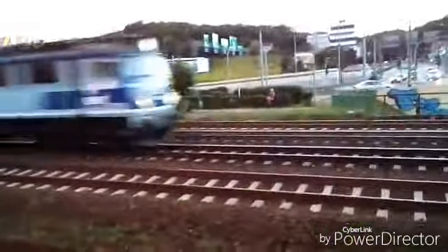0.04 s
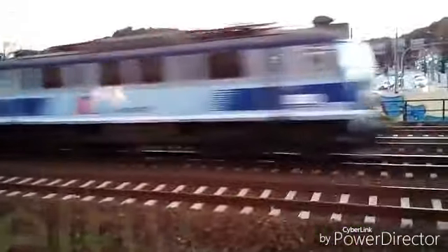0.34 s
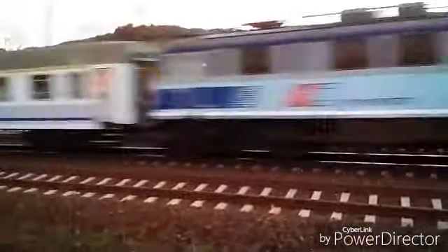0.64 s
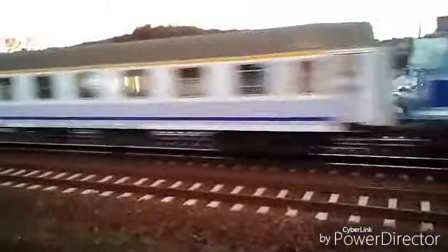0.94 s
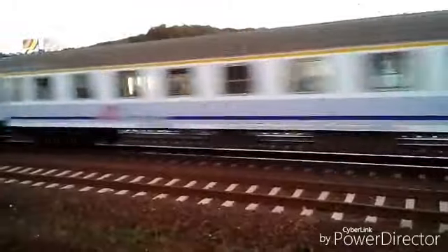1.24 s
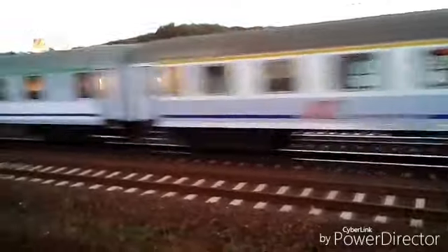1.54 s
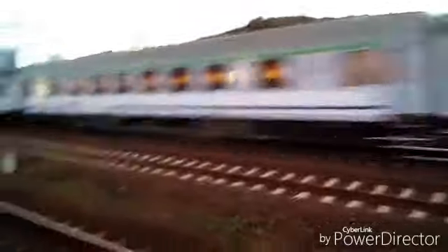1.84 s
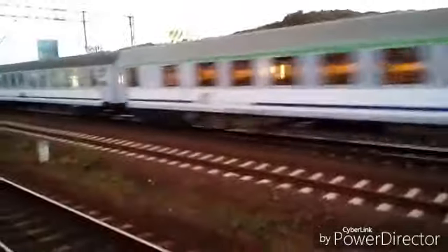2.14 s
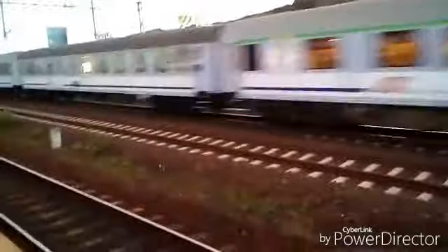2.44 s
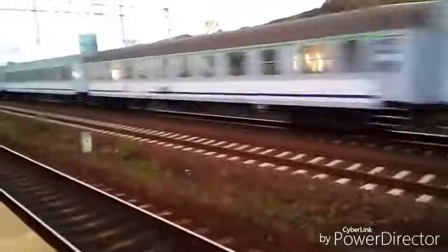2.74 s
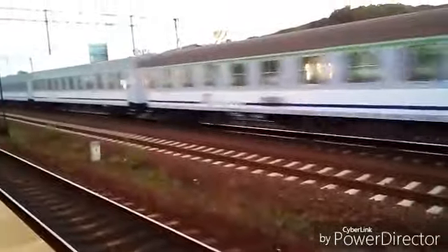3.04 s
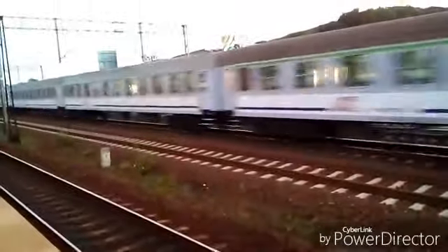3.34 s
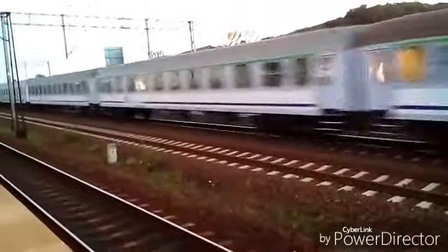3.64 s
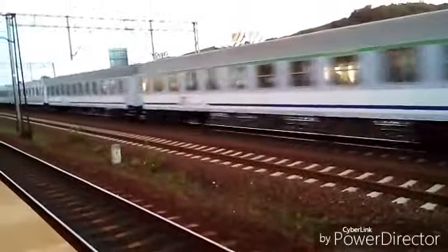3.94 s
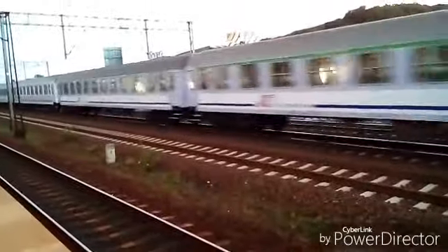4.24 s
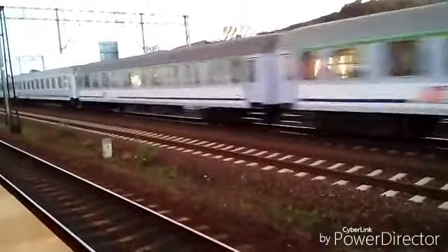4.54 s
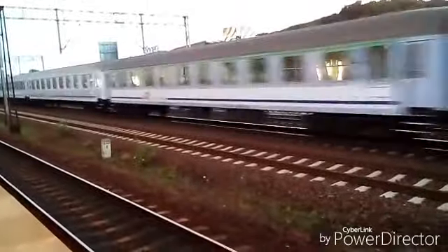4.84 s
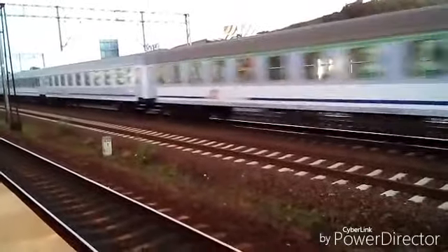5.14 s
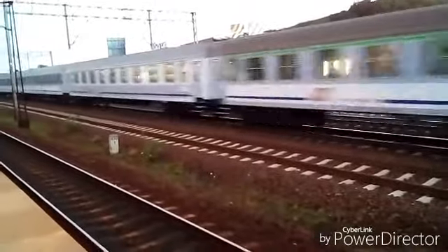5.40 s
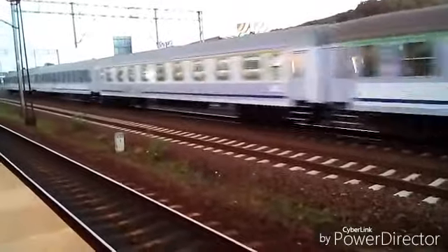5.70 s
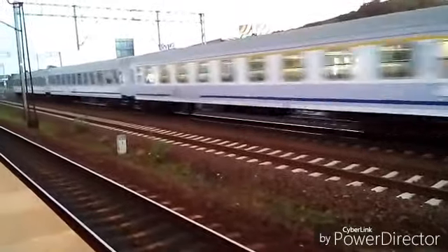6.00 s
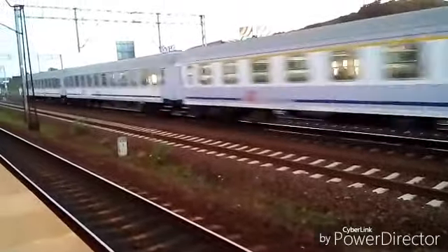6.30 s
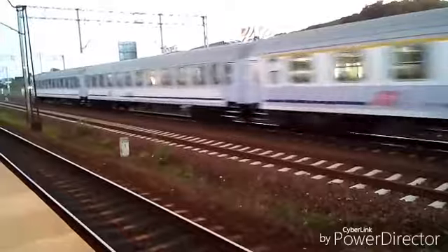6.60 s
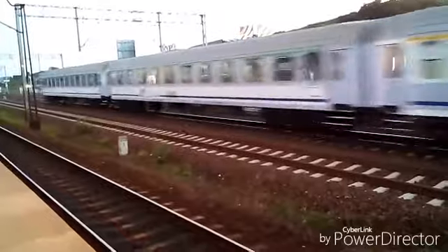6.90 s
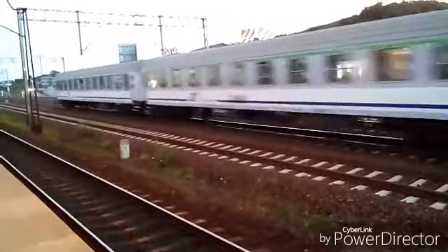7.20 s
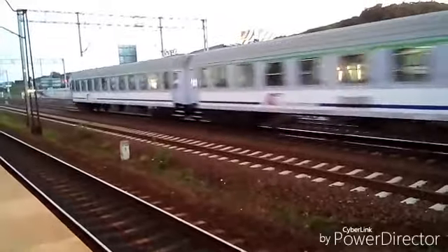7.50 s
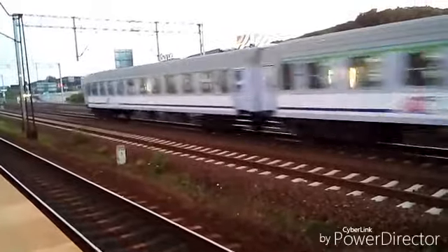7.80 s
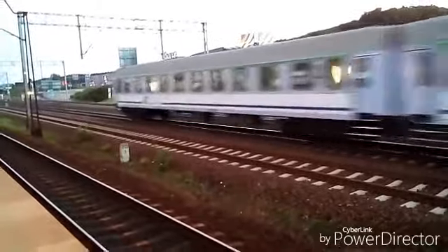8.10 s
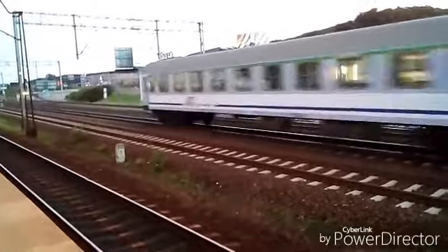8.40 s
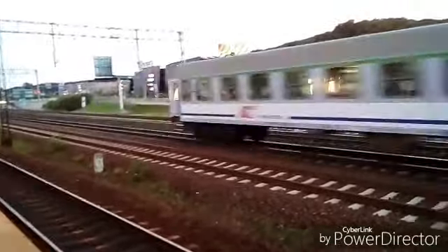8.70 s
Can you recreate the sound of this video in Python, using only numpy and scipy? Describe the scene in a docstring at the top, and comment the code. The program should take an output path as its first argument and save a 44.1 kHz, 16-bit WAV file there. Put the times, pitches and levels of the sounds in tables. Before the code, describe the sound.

An electric passenger train is already rushing past at the start, heard in mono from a station platform two tracks away. The sound builds slightly over the first second as the locomotive's blowers go by with a low drone and a bright rush, strongest near 0.6 seconds and gone by about 2 seconds. A loud, steady roar of wheels on rails carries on throughout, with a faint low rumble from the coach bodies and a thin, fluttering hiss of air above. Roughly once a second a set of wheels passes with a small surge and a metallic ring that slides down in pitch. From about 3 seconds, brief ringing notes swell out of the track, most often between 4 and 7 seconds, over a soft sustained howl. The roar holds nearly level until the end, at about 8.7 seconds, with coaches still passing.

```python
"""Electric train through a station

From the platform, two tracks away, on a mono phone microphone that holds the peaks down.
The locomotive's blowers drone past first, then air hisses along the coaches. Rough wheels on rough
rails make sleepers, rails and wheels roar; each pair of bogies glides down in pitch as it passes."""
import sys
import numpy as np
from scipy import signal
from scipy.fft import rfft, irfft, next_fast_len
from scipy.io import wavfile
from scipy.ndimage import uniform_filter1d, minimum_filter1d, map_coordinates

SR = 44100
rng = np.random.default_rng(int(sys.argv[2]) if len(sys.argv) > 2 else 0)


def to_wav(sig):
    """Store sig (one row per channel, or 1-D mono) as 16-bit WAV at the path in sys.argv[1].

    Samples outside -1..1 are clipped; the rate is SR.
    """
    pcm = np.clip(np.atleast_2d(sig), -1, 1) * 32767
    pcm = np.round(pcm).astype(np.int16)
    wavfile.write(sys.argv[1], SR, pcm.T)  # frames by channels


N = 385875
TIME = np.arange(N) / SR
TRAIN_SPEED, SOUND_SPEED = 25, 343  # m/s


def amp(db):
    """Decibels to gain."""
    return 10 ** (np.asarray(db) / 20)


def unit(x):
    """Scaled to rms 1."""
    return x / np.sqrt(np.mean(x ** 2) + 1e-20)


def curve(rows):
    """Straight lines through (seconds, value) points, one value a sample."""
    return np.interp(TIME, *np.transpose(rows))


def wobble(rate):
    """A smooth random curve with rate knots a second."""
    return map_coordinates(rng.standard_normal(1024), [TIME * rate], mode="wrap")


def filtered(x, response):
    """x shaped by a gain that depends on frequency."""
    size = next_fast_len(N + 8192)
    return irfft(rfft(x, size) * response(np.fft.rfftfreq(size, 1 / SR)), size)[:N]


def steady(x, span_s):
    """Held near rms 1 over every stretch of span_s."""
    power = np.abs(uniform_filter1d(x ** 2, int(span_s * SR)))
    return x / np.sqrt(power + 1e-12)


def noise(spectrum, patchy_db):
    """Noise of rms 1 with the given (Hz, dB) colour and drifting patches of gain."""
    cells = signal.stft(rng.standard_normal(N), nperseg=1024)[2]
    patches = uniform_filter1d(rng.standard_normal(cells.shape), size=6, axis=0)
    patches = uniform_filter1d(patches, size=14, axis=1)
    patchy = signal.istft(cells * amp(patchy_db * unit(patches)), nperseg=1024)[1][:N]
    knots_hz, db = np.transpose(spectrum)
    return unit(filtered(patchy, lambda hz: amp(np.interp(np.log(hz + 1), np.log(knots_hz), db))))


def ringing(modes, count):
    """count samples of noise that rings in (Hz, width in Hz, dB) resonances, rms 1."""
    hz = np.fft.rfftfreq(count, 1 / SR)
    gain = sum(amp(db) / (1 + 2 * ((hz - centre) / width) ** 2) for centre, width, db in modes)
    return unit(irfft(rfft(rng.standard_normal(count)) * gain, count))


def approach(depth_db=3.6, build_s=0.65):
    """Decibels still missing while the locomotive draws level with the microphone."""
    return -depth_db * np.exp(-(TIME / build_s) ** 2)


# The blowers, heard from the platform. Each row: frequency in Hz, relative level in dB.
BLOWER_SPECTRUM = [(100, -44), (150, -23), (185, -14), (260, -6), (400, -25), (1300, -23), (2250, 6.5),
                   (2750, -16), (3650, 2), (4500, -10), (5300, -10), (7000, -37), (10000, -48.5)]

def locomotive(nearest_s, linger_s, level_db):
    """Motor blowers add a low drone and a bright rush while the locomotive is near."""
    near = np.exp(-((TIME - nearest_s) / linger_s) ** 2)
    return amp(level_db + 0.4 * approach()) * near * noise(BLOWER_SPECTRUM, patchy_db=2.0)


# Roughness of the treads going by. Each row: time in seconds, sleeper roar in dB.
TREAD_ROUGHNESS = [(0.3, -17.5), (2.3, -18.5), (3.0, -17), (3.9, -17), (5.7, -17.5), (6.7, -17), (7.6, -17),
                   (8.2, -17), (8.7, -19.5)]
# The sleepers' roar. Each row: frequency in Hz, relative level in dB.
SLEEPER_SPECTRUM = [(200, -66), (345, -21), (390, -11.5), (450, -4.5), (530, -3.5), (660, -2), (750, 0),
                    (900, -1.5), (1100, -2.5), (1300, -8), (1600, -25), (3000, -55)]

def sleepers():
    """Rough treads shake the sleepers: the low part of the roar."""
    level_db = curve(TREAD_ROUGHNESS) + 0.67 * approach() + 0.52 * wobble(rate=9)
    return amp(level_db) * steady(noise(SLEEPER_SPECTRUM, patchy_db=1.0), span_s=0.13)


# The rails, two tracks away. Each row: frequency in Hz, relative level in dB.
RAIL_SPECTRUM = [(800, -45), (1200, -10), (1400, -2), (1650, 0.5), (2000, -1.5), (2400, -4), (2900, -15.5),
                 (4500, -59)]

def rails(level_db):
    """The rails ring under the wheels: the middle of the roar."""
    return amp(level_db) * steady(noise(RAIL_SPECTRUM, patchy_db=1.0), span_s=0.15)


# The rush of all the wheels. Each row: frequency in Hz, relative level in dB.
WHEEL_SPECTRUM = [(1500, -44), (2300, -5), (2700, 0.5), (3300, 1.5), (3900, -2), (4500, -5.5), (5200, -6.5),
                  (6000, -9.5), (6700, -11.5), (7300, -17), (8000, -26.5), (10000, -39), (14000, -70)]

def wheel_rush(level_db):
    """Roughness shakes the wheels themselves: the top of the roar."""
    return amp(level_db) * noise(WHEEL_SPECTRUM, patchy_db=1.04)


# A wheel's resonances. Each row: centre in Hz, width in Hz, relative level in dB.
WHEEL_MODES = [(1676, 87, -1), (1900, 160, 1), (2680, 200, -5.5), (3220, 360, 0.5), (4940, 410, -7),
               (6430, 260, -22)]
# Bogies passing the microphone. Each row: time abeam in seconds, relative ring in dB,
# surge of the wheel rush in dB, surge of the body drone in dB.
BOGIE_PASSES = [(.35, 2, 1.7, 3), (1.1, -2, 0.8, 3), (1.88, -2, 2.5, .5), (2.88, -3, 0.6, 3),
                (3.97, -5.5, 2, 1), (4.95, -6, 1.2, 2), (5.9, -5, 1.5, -0.5), (7.15, -8, 0.9, 3.5),
                (8.169, -14, 1.4, 1)]

def bogies(distance_m):
    """Each bogie's wheels ring sharp as they come and flat as they go, loudest when abeam."""
    out = np.zeros(N)
    for abeam_s, db, _, _ in BOGIE_PASSES:
        path_m = np.hypot(distance_m, TRAIN_SPEED * (TIME - abeam_s))
        sent_s = TIME - path_m / SOUND_SPEED + 1  # the ring starts a second early to cover the delay
        ring = ringing(WHEEL_MODES, count=next_fast_len(N + 2 * SR))
        heard = np.interp(sent_s * SR, np.arange(len(ring)), ring)
        out += amp(db) * distance_m / path_m * heard
    return unit(out)


def surges(reach_m=7.5):
    """Decibels that bogies near the microphone add to the wheel rush and to the body drone."""
    abeam_s, _, rush_db, drone_db = np.transpose(BOGIE_PASSES)
    along_m = TRAIN_SPEED * (TIME - abeam_s[:, None])
    near = 1 / (1 + (along_m / reach_m) ** 2)
    return rush_db @ near, drone_db @ near


def rolling(rail_fade_db_per_s=0.07):
    """Rough wheels on rough rails drive sleepers, rails and wheels at once."""
    surge_db, _ = surges()
    contact = wobble(rate=30)  # rough patches shake rail and wheel together
    uneven = wobble(rate=8)  # no two axles are equally loud
    rail_db = -18.5 - rail_fade_db_per_s * TIME + approach() + 0.22 * surge_db + 0.28 * uneven
    wheel_db = -20.5 + approach() + surge_db + 0.13 * uneven
    roar = sleepers() + rails(rail_db - 0.44 + 0.37 * contact) + wheel_rush(wheel_db + 0.67 * contact)
    return roar + amp(rail_db - 13.0) * bogies(distance_m=10.5)


# Vehicles with a loud underframe. Each row: time abeam in seconds, half the passing time in seconds,
# relative boom in dB, relative drone in dB.
HEAVY_VEHICLES = [(0.7, .8, -49.5, -43), (5.08, 0.27, -49, -45), (6.45, 0.24, -62, -39),
                  (7.6, 0.21, -58, -39), (8.5, 0.58, -63, -40)]
# Underframe boom and body panel drone. Each row: frequency in Hz, relative level in dB.
UNDERFRAME_SPECTRUM = [(25, -20), (50, -11), (85, -0.5), (125, -1), (170, 1.5), (300, -31)]
PANEL_SPECTRUM = [(90, -42), (140, -29), (185, -8.5), (240, -7), (275, 2), (345, 0.5), (420, -2),
                  (600, -54)]

def vehicle_bodies():
    """Underframes boom and body panels drone, more so while a heavy vehicle is abeam."""
    boom_power, drone_power = amp(-58.5) ** 2, amp(-41.5) ** 2  # an ordinary coach
    for abeam_s, half_s, boom_db, drone_db in HEAVY_VEHICLES:
        abeam = np.exp(-((TIME - abeam_s) / half_s) ** 4)
        boom_power += abeam * amp(boom_db) ** 2
        drone_power += abeam * amp(drone_db) ** 2
    _, surge_db = surges()
    boom = np.sqrt(boom_power) * steady(noise(UNDERFRAME_SPECTRUM, patchy_db=-2.0), span_s=0.3)
    drone = np.sqrt(drone_power) * steady(noise(PANEL_SPECTRUM, patchy_db=2.5), span_s=0.24)
    return amp(-2.0) * boom + amp(surge_db + 0.8 * approach()) * drone


# The hiss reaching the platform. Each row: time in seconds, base level in dB.
HISS_LEVELS = [(0.3, -49.5), (0.75, -49.3), (1.33, -45.5), (1.95, -45), (2.5, -47), (3.6, -46),
               (4.98, -43.5), (6.1, -47), (7.8, -46.5), (8.25, -45), (8.7, -43.5)]
# The hiss and the finer sizzle above it. Each row: frequency in Hz, relative level in dB.
HISS_SPECTRUM = [(5000, -18), (7800, 0), (9700, 1.5), (11500, -4.5), (13000, -16), (15000, -35)]
SIZZLE_SPECTRUM = [(9000, -30), (11800, -2), (13000, -6), (13900, -8), (14650, 3), (15400, 0), (15700, -14)]

def air_hiss(sizzle_swing=1.6, sizzle_fade_db_per_s=0.45):
    """Turbulent air flutters along the coaches; its finest sizzle swings wider and fades to the rear."""
    surge_db, _ = surges()
    hiss_db = curve(HISS_LEVELS) + 1.1 * approach() + 0.35 * surge_db
    swing_db = sizzle_swing * (hiss_db - hiss_db.mean()) + 1.6 * approach()
    sizzle_db = hiss_db.mean() - 6 + swing_db - sizzle_fade_db_per_s * TIME
    eddies_db = 1.3 * wobble(rate=31)
    hiss = amp(hiss_db - 1.1 + eddies_db / 2) * noise(HISS_SPECTRUM, patchy_db=2.0)
    sizzle = amp(sizzle_db + eddies_db) * noise(SIZZLE_SPECTRUM, patchy_db=0.5)
    return hiss + sizzle


def howl(hz, width_hz, loudest_s, linger_s, level_db):
    """The coaches' treads keep one track resonance howling for some seconds."""
    ring = ringing([(hz, width_hz, 0)], count=N)
    return amp(level_db) * np.exp(-((TIME - loudest_s) / linger_s) ** 4) * ring


# Brief notes from the track. Each row: peak time in seconds, pitch in Hz, width in Hz,
# spread in seconds, level in dB.
TRACK_SWELLS = [(2.95, 1660, 110, .13, -23), (3.87, 1060, 110, 0.16, -22), (4.08, 1830, 200, 0.1, -17.5),
                (4.647, 810, 80, 0.07, -27), (4.88, 1800, 130, .08, -23), (5.327, 720, 160, 0.079, -20),
                (5.388, 440, 45, 0.1, -24), (5.762, 1590, 110, .08, -21.5), (6.015, 444, 45, 0.06, -23),
                (6.5, 1660, 160, .1, -23), (6.62, 453, 45, 0.046, -23), (6.78, 744, 130, .12, -21),
                (6.9, 900, 90, 0.063, -18), (7.55, 760, 130, 0.1, -22.5), (8.3, 765, 70, 0.13, -24.5)]

def swells():
    """Rough treads briefly drive one resonance of the track harder."""
    out = np.zeros(N)
    for peak_s, hz, width_hz, spread_s, db in TRACK_SWELLS:
        ring = np.resize(ringing([(hz, width_hz, 0)], count=2 * SR), N)
        envelope = np.exp(-((TIME - peak_s) / spread_s) ** 2 / 2)
        out += amp(db) * steady(ring, span_s=0.12) * envelope
    return out


# Puffs of air on the microphone. Each row: peak time in seconds, level in dB.
AIR_PUFFS = [(3.8, -58), (5.5, -58), (6.22, -51), (6.46, -49), (6.78, -54), (8.2, -56), (8.67, -55)]
# Their rumble. Each row: frequency in Hz, relative level in dB.
BUFFET_SPECTRUM = [(8, 0), (24, 2), (35, -8), (50, -14), (100, -35)]

def draught(level_db, puff_s):
    """Stirred air faintly buffets the microphone, now and then in a puff."""
    puffs = sum(amp(db) * np.exp(-((TIME - peak_s) / puff_s) ** 2) for peak_s, db in AIR_PUFFS)
    return (amp(level_db) + puffs) * steady(noise(BUFFET_SPECTRUM, patchy_db=-1.0), span_s=0.32)


def scene():
    """Track, train and draught meet at one microphone on the platform."""
    sleeper_howl = howl(hz=446, width_hz=47, loudest_s=5.84, linger_s=4.9, level_db=-32.0)
    rail_howl = howl(hz=768, width_hz=115, loudest_s=6.9, linger_s=2.1, level_db=-31.5)
    track = rolling() + sleeper_howl + rail_howl + amp(-2.5) * swells()
    train = locomotive(nearest_s=0.63, linger_s=1.0, level_db=-20.5) + vehicle_bodies() + air_hiss()
    mono = track + train + draught(level_db=-59.5, puff_s=0.05)
    return np.array([mono, mono])


def limiter(x, ceiling_db, hold_s):
    """The gain ducks around every peak that would pass the ceiling."""
    size = int(hold_s * SR)
    needed = np.minimum(1, amp(ceiling_db) / (np.abs(x) + 1e-9))
    return x * uniform_filter1d(minimum_filter1d(needed, size), size)


def record(dry):
    """The phone limits the peaks, cuts the highest treble and feeds both channels alike."""
    held = limiter(dry.mean(axis=0), ceiling_db=-3.5, hold_s=0.0031)
    mono = filtered(held, lambda hz: hz < 15550)
    return np.array([mono, mono])


dry = scene()
out = record(dry)
to_wav(out)
```